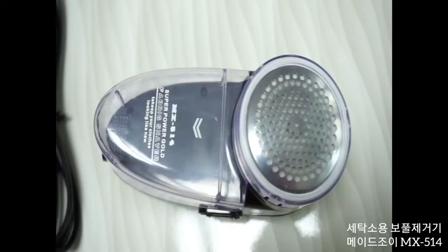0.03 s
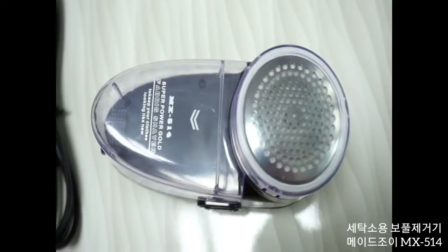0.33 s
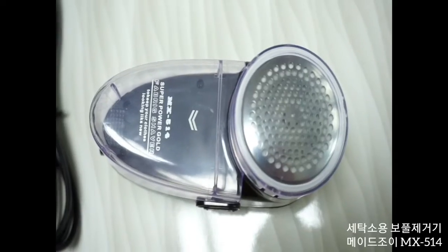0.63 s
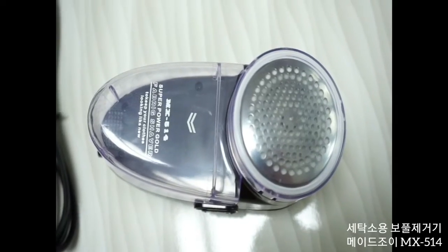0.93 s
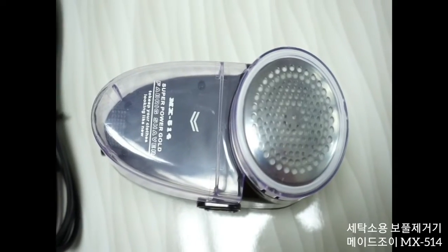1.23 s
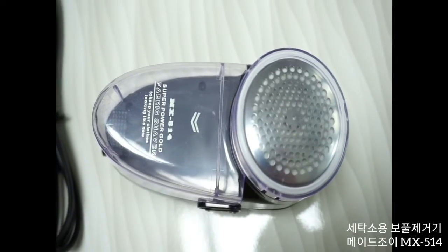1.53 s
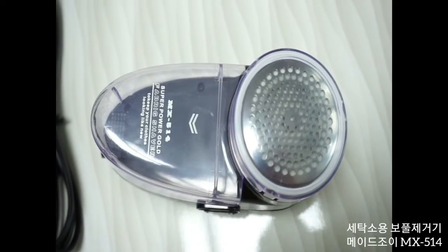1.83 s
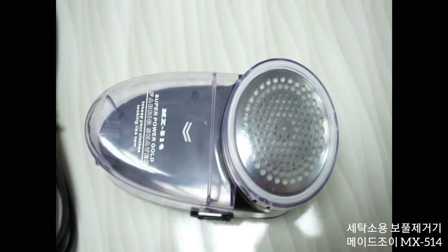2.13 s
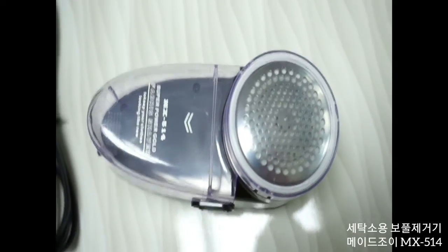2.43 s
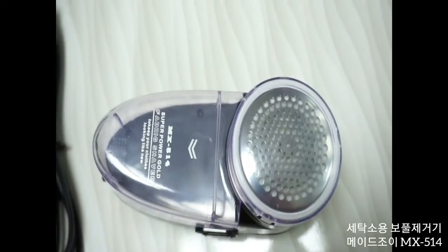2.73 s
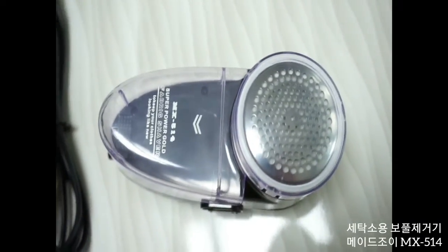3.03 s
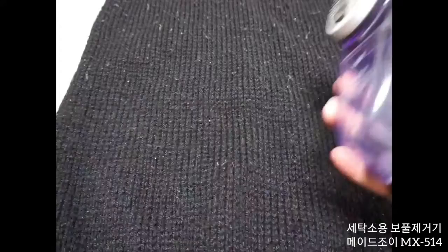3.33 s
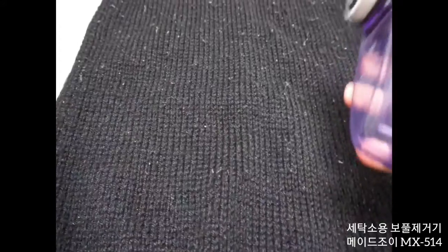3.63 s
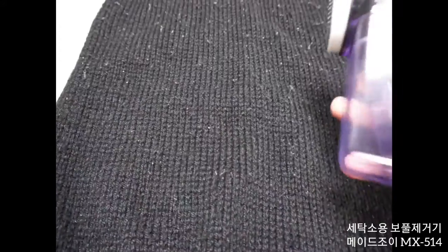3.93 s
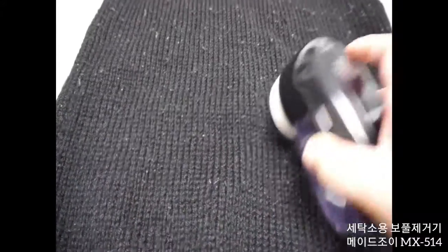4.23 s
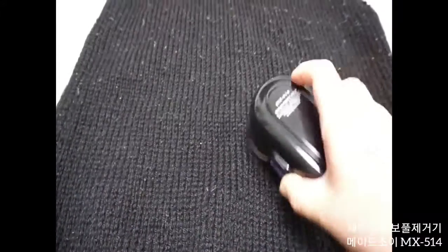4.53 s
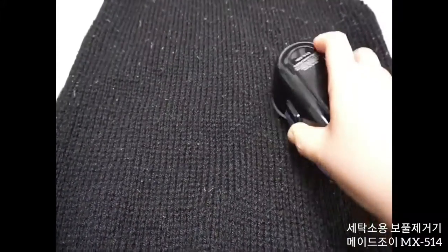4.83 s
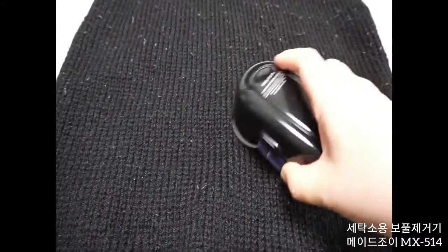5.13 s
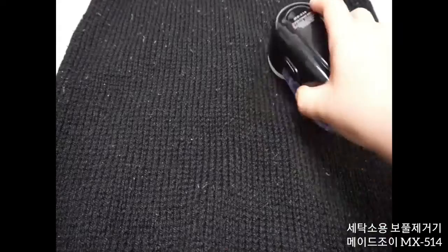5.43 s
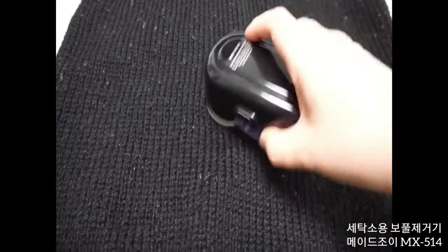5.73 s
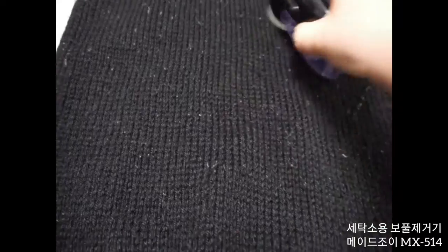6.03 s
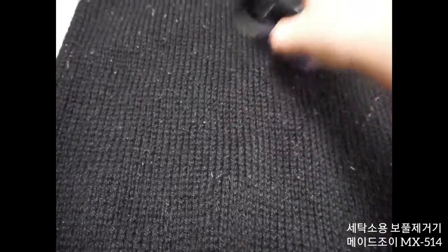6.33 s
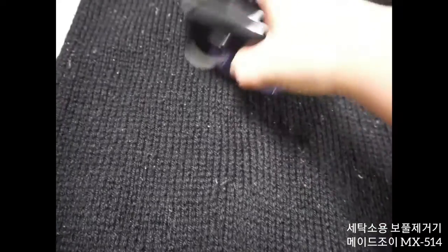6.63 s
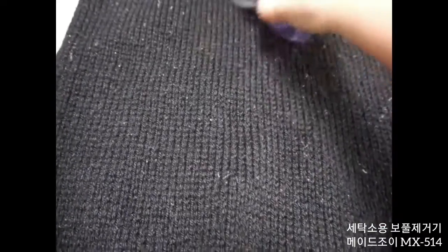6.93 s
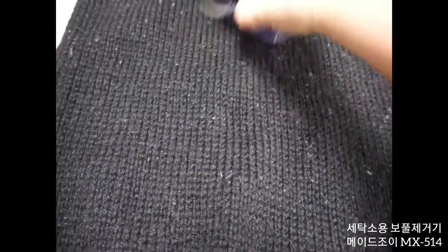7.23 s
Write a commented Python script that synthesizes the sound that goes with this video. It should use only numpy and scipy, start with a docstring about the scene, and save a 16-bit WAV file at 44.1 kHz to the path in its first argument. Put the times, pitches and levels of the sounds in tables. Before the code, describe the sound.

An electric fabric shaver buzzes steadily, cuts off briefly, then spins up again and whirs unevenly as it is pushed over a knitted sweater.

```python
"""A corded fabric shaver idles close to a stereo microphone: its blade wheel hums and its loose parts tap once
every turn, while the microphone shifts position. At 3.3 s the scene changes: faint room air and a hand rustling
on the case. At 3.8 s the motor spins up in the hand, its gears chattering. From 4.5 s it is pushed over a
knitted sweater, travelling from the right towards the middle: each push loads the motor while the blades snip
fibres behind the steel screen."""
import sys
import numpy as np
from scipy import signal
from scipy.fft import rfft, irfft, next_fast_len
from scipy.io import wavfile
from scipy.ndimage import uniform_filter1d, map_coordinates

SR = 44100
rng = np.random.default_rng(int(sys.argv[2]) if len(sys.argv) > 2 else 0)


def wrap_up_sound(samples):
    """Save the sound to the file named by the first command line argument, as 16-bit audio."""
    columns = np.atleast_2d(samples).T
    # keep every value between -1 and 1, then stretch to whole-number steps
    tamed = np.clip(columns, -1, 1)
    steps = np.round(tamed * 32767).astype(np.int16)
    wavfile.write(sys.argv[1], SR, steps)


N = 325458
TIME = np.arange(N) / SR
ROOM_ON_S, SWITCH_ON_S, TOUCH_DOWN_S = 3.343, 3.803, 4.523
FREE_SPEED_HZ = 92.81  # shaft turns per second, unloaded in the hand

# Stereo likeness at the microphone after the break: f/Hz, likeness/0-1
HAND_ALIKE = [(60, 0.38), (170, 0.69), (490, 0.85), (1390, 0.73), (3950, 0.53), (11300, 0.68)]
# Stereo balance after the break: f/Hz, left minus right/dB
HAND_SIDE = [(600, 1.5), (1100, 0.6), (2000, -2.5), (6300, 0), (11000, 2.3)]


def amp(db):
    return 10 ** (np.asarray(db) / 20)


def unit(x):
    return x / np.sqrt(np.mean(x ** 2) + 1e-20)


def along(points, hz):
    """Read (f/Hz, value) points on a log axis."""
    f, values = np.transpose(points)
    return np.interp(np.log(hz + 1), np.log(f + 1), values)


def curves(rows):
    """One value per sample for each column after the time."""
    times, *columns = np.transpose(rows)
    return [np.interp(TIME, times, column) for column in columns]


def between(start, end=N / SR):
    return (TIME >= start) & (TIME < end)


def swell(peak_s, peak_db, rise, fall):
    """Gain that climbs to a peak and dies away, at rates in dB/s."""
    t = TIME - peak_s
    return amp(peak_db + np.minimum(rise * t, -fall * t))


def wobble(rate):
    """A smooth random curve with `rate` knots a second."""
    coarse = np.arange(0, N + 64, 64)
    knots = rng.standard_normal(int(N * rate / SR) + 4)
    return np.interp(np.arange(N), coarse, map_coordinates(knots, [coarse * rate / SR]))


def filtered(x, response):
    """Shape x by a function of frequency."""
    size = next_fast_len(N + SR // 2)
    return irfft(rfft(x, size) * response(np.fft.rfftfreq(size, 1 / SR)), size)[..., :N]


def coloured(x, spectrum):
    """Shape x by (f/Hz, level/dB) points, at unit RMS."""
    return unit(filtered(x, lambda f: amp(along(spectrum, f))))


def resonance(f, hz, width):
    """Causal response of one mode."""
    return 1j * f * width / (hz * hz - f * f + 1j * f * width)


def ringing(x, modes, low_hz):
    """x through modes whose powers add, radiating little below low_hz."""
    def response(f):
        power = sum(np.abs(amp(db) * resonance(f, hz, width)) ** 2 for hz, width, db in modes)
        return np.sqrt(power) * f ** 6 / (f ** 6 + low_hz ** 6)
    return unit(filtered(x, response))


def strikes(times, sizes):
    """Impulses, each shared between two neighbouring samples."""
    at = np.clip(times * SR, 0, N - 2)
    index, fraction = at.astype(int), at % 1
    return np.bincount(index, sizes * (1 - fraction), N) + np.bincount(index + 1, sizes * fraction, N)


def pan(side_db):
    return amp(np.array([[.5], [-.5]]) * side_db)


def spread(pair, alike, side):
    """Two unrelated signals become left and right of given likeness and balance; the right leads."""
    def weights(f):
        angle = np.arccos(np.clip(along(alike, f), -1, 1)) / 2
        return np.array([np.cos(angle), np.sin(angle)])
    mid, wide = filtered(pair, weights)
    lead = lambda f: np.exp(np.array([[-1j], [1j]]) * np.pi * f * 12e-6)
    return filtered(np.array([mid + wide, mid - wide]), lambda f: pan(along(side, f)) * lead(f))


def room():
    """Faint room air, heard while the motor rests."""
    # Room tone: f/Hz, relative level/dB
    spectrum = [(24, -55), (40, -31), (112, -19), (256, -8.5), (309, -7), (410, -13), (483, -9.5),
                (720, -10), (791, -15), (11000, -31.5), (14300, -71), (22000, -120)]
    air = coloured(rng.standard_normal((2, N)), spectrum)
    fade_db, = curves([(3.8, -57), (3.95, -69)])
    return spread(air, HAND_ALIKE, HAND_SIDE) * amp(fade_db) * between(ROOM_ON_S)


def grip_rustle():
    """The hand shifts its grip and rubs on the case."""
    # Hand on the case: f/Hz, relative level/dB
    spectrum = [(240, -56), (400, -31), (582, -7), (623, -20), (1040, -6), (1540, -26), (2050, -27),
                (2490, -6.5), (2670, -18), (11000, -29), (14300, -63), (22000, -120)]
    rustle = spread(coloured(rng.standard_normal((2, N)), spectrum), HAND_ALIKE, HAND_SIDE)
    return rustle * swell(peak_s=3.525, peak_db=-50, rise=170, fall=172) * between(ROOM_ON_S)


def knocks():
    """Light knocks of handling sound through the table, centred in the image."""
    # Knocks: t/s, level/dB, f/Hz, rise/s
    bumps = [(2.435, -26, 620, 0.0026), (4.72, -58, 85, .011), (4.76, -59, 90, 0.0098),
             (4.83, -59, 78, 0.0095), (5.38, -67, 135, 0.0099), (6.44, -50, 104, 0.0086),
             (6.84, -56, 87.9, .011)]
    out, t = np.zeros(N + SR), np.arange(SR // 4) / SR
    for start, db, hz, rise in bumps:
        envelope = amp(db) * t / rise * np.exp(1 - t / rise)
        out[round(start * SR):][:len(t)] += envelope * np.sin(2 * np.pi * hz * t)
    return out[:N]


def shaft(speed, flutter):
    """Turns made so far by a slightly unsteady shaft."""
    return np.cumsum(speed * (1 + flutter * wobble(60))) / SR


def scrape(turns, rough, change_rate, orders=135, size=4096):
    """Two rubbing signals: a slowly changing pattern that repeats every turn, plus fresh noise."""
    pair = np.zeros((2, N))
    for _ in range(3):
        harmonics = np.exp(2j * np.pi * rng.random((2, orders)))
        patterns = irfft(np.pad(harmonics, ((0, 0), (1, 0))), size)
        repeating = np.array([np.interp(turns % 1 * size, np.arange(size), p) for p in patterns])
        pair += wobble(change_rate) * repeating
    pair /= np.sqrt(np.abs(uniform_filter1d(pair ** 2, size)) + 1e-20)
    rough = np.clip(rough, 0, 1)
    return np.sqrt(1 - rough) * pair + np.sqrt(2 * rough) * rng.standard_normal((2, N))


def taps(turns, jitter_turns=.00042, scatter_db=2.5, gap_s=.000728):
    """Each loose part strikes a quick double blow at its own point of the turn and rings briefly."""
    # Loose parts: position/turns, f/Hz, nominal width/Hz, relative level/dB
    loose_parts = [(0.57, 5790, 950, 3.5), (.77, 5640, 530, 3.5), (0.68, 6540, 1200, -7),
                   (1, 7700, 1700, -6), (0.42, 10140, 720, 3), (.9, 10200, 520, -2)]
    pair, whole_turns = np.zeros((2, N)), np.arange(int(turns[-1]))
    for position, hz, width, db in loose_parts:
        timing, first, second = rng.standard_normal((len(whole_turns), 3)).T
        drifting_turns = turns + .0049 * wobble(2.99)
        times = np.interp(whole_turns + position + jitter_turns * timing, drifting_turns, TIME)
        blows = np.array([strikes(times, amp(scatter_db * first)),
                          strikes(times + gap_s, amp(scatter_db * second))])
        ring = unit(filtered(blows, lambda f: resonance(f, hz, 1.34 * width) ** 2))
        pair += amp(db + .5 * wobble(3.5)) * ring
    return unit(pair)


def idle_rubbing(turns):
    """Rubbing inside the case, swelling twice a turn."""
    # Rubbing that is new on every turn: f/Hz, share/0-1
    fresh = [(95, .6), (280, .9), (600, .55), (2500, .48), (6000, .27), (11000, .22)]
    # Response of the idling case: f/Hz, relative level/dB
    case = [(30, -25), (85, -6), (130, 0), (220, 3.5), (380, -6), (750, -4.5), (1400, 2.5), (2400, -2),
            (3300, -4), (4750, -2.5), (5300, 0), (7400, 3.5), (8750, -5), (9300, 5), (11000, -4)]
    rub = filtered(scrape(turns, rough=0, change_rate=1.8), lambda f: np.sqrt(1 - along(fresh, f)))
    rub += filtered(rng.standard_normal((2, N)), lambda f: np.sqrt(along(fresh, f)))
    return coloured(rub * amp(.55 * np.cos(4 * np.pi * turns)), case)


def idle_tones(turns, registers_db):
    """Multiples of the shaft rate, whose balance changes as the microphone moves."""
    # Microphone's way from its first position to its second: t/s, share/0-1
    microphone_path = [(0, 0), (1.9, 0), (2.65, 0.24), (2.95, 0.87), (3.3, 1)]
    # Shaft orders: multiple, relative level/dB at each of the two positions, nominal left minus right/dB
    orders = [(2, -1, -1, 0), (3, -10, -7, 0), (5, -23, -17, -1), (7, -23, -20, 0), (9, -17, -21, 1),
              (12, -11, -15, -3), (14, -17, -14, 1), (15, -7, -3, 0), (16, -14, -12, 2), (19, -17, -16, 1),
              (23, -16, -17, -8), (24, -3, -5, -5), (25, -18, -17, 0), (28, -21, -22, -3),
              (30, -11, -11, -7), (34, -12, -10, -4), (36, -12, -21, -4), (42, -9, 1, -3), (47, -3, -8, 4),
              (50, -11, -12, -4), (55, -13, -33, -6), (56, -13, -10, -5), (58, -8, -11, 0),
              (61, -13, -12, -2), (62, -15, -10, -2), (63, -15, -21, -7), (64, -8, -6, -7),
              (67, -14, -14, -6), (75, -17, -25, -2), (106, -13, -19, -12)]
    moved, = curves(microphone_path)
    hum_db = registers_db[0]
    tones = np.zeros((2, N))
    for order, first_db, second_db, side_db in orders:
        register = np.digitize(order, [4, 32, 53])
        waver_db = (1.6 if register else .4) * wobble(3.04)
        level_db = registers_db[register] + first_db + moved * (second_db - first_db) + waver_db
        if order == 3:  # swells faster than the rest of the hum
            level_db += hum_db - hum_db.mean()
        # short waves reach the two capsules out of step
        phase = rng.random() + np.array([[-.5], [.5]]) * order * .0037
        tones += pan(1.13 * side_db) * amp(level_db) * np.sin(2 * np.pi * (order * turns + phase))
    return tones


def idling():
    """The shaver runs free close to the microphone: clean tones over rubbing and tapping."""
    # Shaft rate: t/s, f/Hz
    speed = [(0.1, 92.0), (0.43, 91.9), (0.67, 92.3), (1.16, 92.6), (1.41, 91.8), (2.24, 92.5),
             (2.51, 92.0), (3.05, 93.1), (3.28, 93.1)]
    # Registers, low to high: t/s, relative level/dB of hum, gear whine, screen ring and rattle
    levels = [(0.1, -38, -30, -47, -30.5), (0.51, -36.5, -30, -42, -29.5), (0.98, -33, -30.5, -36.5, -28.5),
              (1.74, -33, -27.5, -43.5, -29), (2.26, -31.5, -28, -35.5, -27.5), (2.48, -32, -29, -45, -28),
              (2.69, -31, -28.5, -36, -27.5), (2.92, -32, -31.5, -37, -26.5),
              (3.28, -31.5, -28, -39.5, -28)]
    # Stereo likeness of the rattle: f/Hz, likeness/0-1
    alike = [(60, 0.97), (170, 0.94), (490, 0.66), (1390, 0.15), (3950, 0.16), (11300, 0.1)]
    # Stereo balance of the rattle: f/Hz, left minus right/dB
    side = [(600, 0), (2000, 0.5), (6300, -3), (11000, -3)]
    turns = shaft(curves(speed)[0], flutter=.000473)
    registers_db = curves(levels)
    tones = amp(2) * idle_tones(turns, registers_db)
    rattle_db = registers_db[3]
    rattle = amp(rattle_db + 1) * idle_rubbing(turns) + amp(rattle_db - 1.6) * taps(turns)
    return (tones + spread(rattle, alike, side)) * between(.078, 3.301)


def held(start, length, ramp_s=.03):
    """The hand bears down, holds and lets go: 0-1."""
    t = TIME - start
    return np.clip(np.minimum(t, length - t) / ramp_s + .5, 0, 1)


def run_up(rise_s=.081, creep_hz=10.5, creep_s=.3):
    """Shaft rate of the unloaded motor: a fast rise, then a slow creep to full speed."""
    t = np.maximum(TIME - SWITCH_ON_S, 0)
    return (1 - np.exp(-t / rise_s)) * (FREE_SPEED_HZ - creep_hz * np.exp(-t / creep_s))


def sag(drag, inertia_s=.088):
    """Speed lost to drag; the rotor's inertia makes it come and go late."""
    keep = np.exp(-1 / (inertia_s * SR))
    return signal.lfilter([1 - keep], [1, -keep], drag)


def gear_chatter(turns, play_cycles=.34, scatter_db=2.5):
    """The gears chatter while running up, as their teeth never mesh evenly."""
    chatter = np.zeros(N)
    for order, db in zip(range(18, 27), [0, -1, -2, -15, -17, -6, 0, -9, -2]):
        gain = amp(db + scatter_db * wobble(28))
        chatter += gain * np.sin(2 * np.pi * (order * turns + play_cycles * wobble(170)))
    return swell(peak_s=4.035, peak_db=-29.5, rise=48, fall=135) * unit(chatter)


def screen_song(turns, order=68):
    """The screen sings on one shaft order as the motor nears full speed."""
    tone = amp(3 * wobble(40)) * np.sin(2 * np.pi * order * turns)
    return swell(peak_s=4.24, peak_db=-30, rise=75, fall=150) * tone


def snips(decay_s=.0061):
    """Each bobble caught by the blades tears in a short burst."""
    # Caught bobbles: t/s, relative level/dB
    bobbles = [(4.5514, -13), (4.567, -8.5), (4.6314, -17), (5.2444, -10), (5.2574, -16), (5.2714, -9.5),
               (6.4701, -13), (6.721, -10), (6.8713, -20), (6.9064, -18), (6.931, -12.5), (6.9424, -12),
               (7.043, -6), (7.1596, -9), (7.313, -14)]
    bursts, t = np.zeros((2, N + SR)), np.arange(SR // 20) / SR
    for start, db in bobbles:
        envelope = amp(db - 5.5) * np.exp(-t / decay_s)
        bursts[:, round(start * SR):][:, :len(t)] += envelope * rng.standard_normal((2, len(t)))
    return filtered(bursts[:, :N], lambda f: .55 * resonance(f, 1140, 1400) ** 2
                    + resonance(f, 5430, 1400) ** 2 + 1.36 * resonance(f, 7500, 6200) ** 2)


def blade_tones(turns, whir_db, hiss_db, contact):
    """Strong orders emerge as the motor gains speed, and change weight as the blades meet the knit."""
    # Shaft orders in the hand: multiple, relative level/dB running free, the same under load
    orders = [(8, -12, -15), (9, -7, -12), (10, -11, -15), (11, -10, -14), (12, -3, -13), (13, -22, -13),
              (14, -12, -11), (15, -11, -15), (16, -12, -18), (17, -20, -12), (22, -23, -17),
              (24, -14, -19), (25, -10, -16), (28, -12, -18), (30, -15, -16), (42, -23, -16),
              (48, -13, -21), (55, -14, -28), (61, -10, -16), (62, -8, -22), (64, -16, -17), (65, -21, -14),
              (67, -10, -15), (72, -22, -17), (84, -16, -17), (85, -16, -16), (86, -22, -16),
              (91, -14, -16)]
    emerge_db, = curves([(3.85, -32), (4.05, -10), (4.25, -2), (4.48, 4.5)])
    jog_turns = .0028 * contact * wobble(120)  # fibres catch the blades and jog the wheel
    pair = np.zeros((2, N))
    for order, free_db, loaded_db in orders:
        register_db = whir_db if order < 53 else hiss_db
        waver_db = (1.98 + 1.6 * contact) * wobble(11)
        level_db = register_db + emerge_db + free_db + contact * (loaded_db - free_db) + waver_db
        pair += amp(level_db) * np.sin(2 * np.pi * (order * (turns + jog_turns) + rng.random((2, 1))))
    return pair


def wheel_rubbing(turns, speed_share, whir_db, hiss_db):
    """The rubbing wheel makes the case whir and the screen hiss, unevenly at low speed and in fuzz."""
    # Fuzz under the head: t/s, amount/0-1
    fuzz_amounts = [(4.5, 0), (4.6, 0.4), (5, 0.07), (5.4, 0.39), (5.78, 0.62), (6, 0.28), (6.45, 0.38),
                    (6.9, 0.67), (7.38, 0.63)]
    # Modes of the hand-held case: f/Hz, width/Hz, relative level/dB
    case_modes = [(249, 71, -3), (444, 28, -1.5), (823, 91, 2), (1060, 630, 2), (1410, 87, -8.5),
                  (2040, 710, -2), (2675, 55, 1.5), (3700, 440, 0), (4360, 220, -6)]
    # Modes of the steel screen: f/Hz, width/Hz, relative level/dB
    screen_modes = [(5460, 220, -5), (5820, 350, 1), (6720, 480, -6), (7360, 930, -4.5), (7800, 320, -2.5),
                    (8300, 360, -5.5), (9820, 590, -2), (10870, 340, -5)]
    fuzz, = curves(fuzz_amounts)
    uneven = np.clip(fuzz + 1 - speed_share, 0, 1)
    # fibres reach the wheel in clumps, and it rubs harder once a turn
    clumps_db = uneven * (3.2 * wobble(45) + 1.2 * wobble(500) + 1.6 * wobble(16))
    beat = np.cos(2 * np.pi * turns) + .6 * np.cos(6 * np.pi * turns)
    case_rub = scrape(turns, rough=.59 + .49 * uneven, change_rate=2.5)
    screen_rub = scrape(turns, rough=.38 + .69 * uneven, change_rate=2.5)
    whir = ringing(case_rub * amp(.68 * clumps_db + .76 * beat), case_modes, low_hz=218)
    hiss = ringing(screen_rub * amp(clumps_db + 1.28 * beat), screen_modes, low_hz=2480)
    return amp(whir_db - 1.25 + 3.5 * fuzz) * whir + amp(hiss_db + 5.5 * fuzz) * hiss


def shaving(knit_drag_hz=4.81):
    """The shaver spins up in the hand and strokes the knit; steady drag and pushes slow the motor."""
    # Pushes into the knit: t/s, length/s, drag on the shaft rate/Hz, added whir/dB, added hiss/dB
    pushes = [(4.572, 0.04, 11.3, 2, 1.5), (4.636, 0.12, 1.2, -0.8, -1.5), (4.781, 0.203, 7.1, 0.6, -1.5),
              (5.221, 0.054, 5.8, 1.5, 1.5), (5.483, 0.045, 3.1, -0.8, -1), (5.747, 0.053, 4.54, 2.1, 0.5),
              (6.046, 0.072, 4.17, -0.7, 0.5), (6.206, 0.14, 1.4, -0.8, 0.8), (6.405, 0.11, 2.8, -2.7, -2),
              (6.687, 0.054, 9.0, 1, 1), (6.863, 0.089, 11.0, 1.6, 2), (7.012, 0.064, 5.5, 0.5, -2),
              (7.111, 0.094, 2.0, -0.2, -1), (7.247, 0.11, 3.46, -1, -1.1)]
    # The shaver's way across the microphone: t/s, left minus right/dB
    travel = [(3.8, -7), (4.3, -3.5), (5.2, -3), (6.2, -2.1), (7.3, 0.5)]
    contact = held(TOUCH_DOWN_S, N / SR)
    push_drag_hz, push_whir_db, push_hiss_db = sum(
        np.outer(effects, held(start, length)) for start, length, *effects in pushes)
    free_hz = run_up()
    turns = shaft(free_hz - sag(knit_drag_hz * contact + push_drag_hz), flutter=.002204)
    speed_share = free_hz / FREE_SPEED_HZ
    speed_db = 20 * np.log10(np.maximum(speed_share, .05))
    # levels rise with the run-up; the cloth muffles the head once it lies on it
    whir_db = -29.5 + 1.54 * speed_db - 2 * contact + push_whir_db
    hiss_db = -27.5 + 1.67 * speed_db - .05 * contact + push_hiss_db
    sound = wheel_rubbing(turns, speed_share, whir_db, hiss_db)
    sound[0] += speed_share ** 2 * gear_chatter(turns)  # row 0 becomes the stereo mid
    sound += blade_tones(turns, whir_db + .14, hiss_db + .35, contact) + snips()
    sound[0] += speed_share ** 2 * screen_song(turns)
    return spread(sound, HAND_ALIKE, HAND_SIDE) * pan(curves(travel)[0]) * between(SWITCH_ON_S)


def scene():
    return idling() + shaving() + grip_rustle() + knocks() + room()


def record(dry, top_hz=11040):
    """The recorder keeps nothing above its band limit."""
    return filtered(dry, lambda f: np.clip((top_hz - f) / 100 + .5, 0, 1))


dry = scene()
out = record(dry)
wrap_up_sound(out)
```